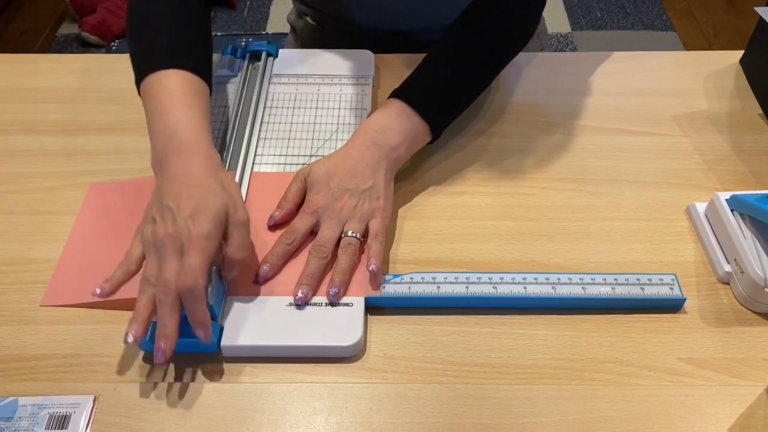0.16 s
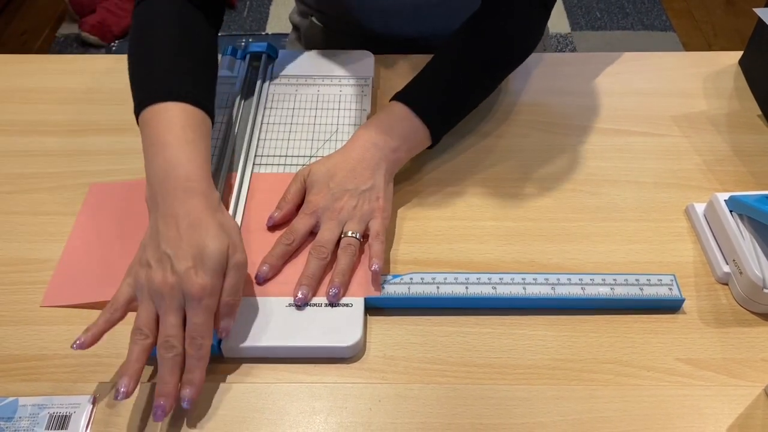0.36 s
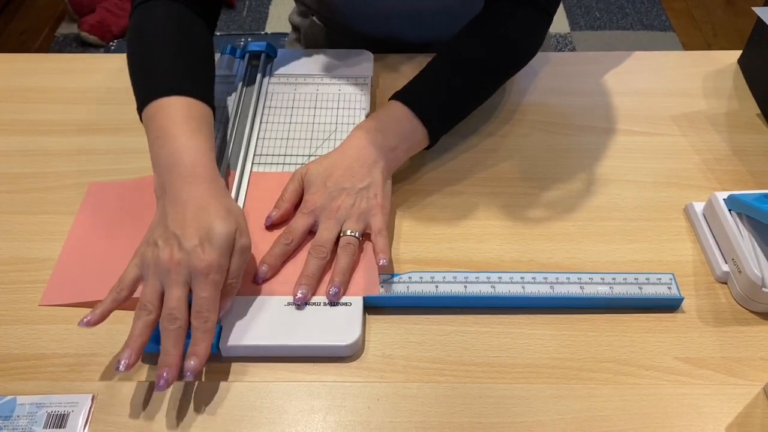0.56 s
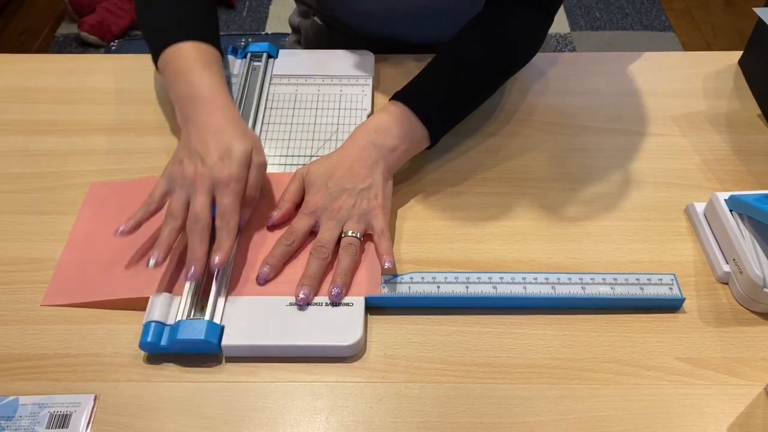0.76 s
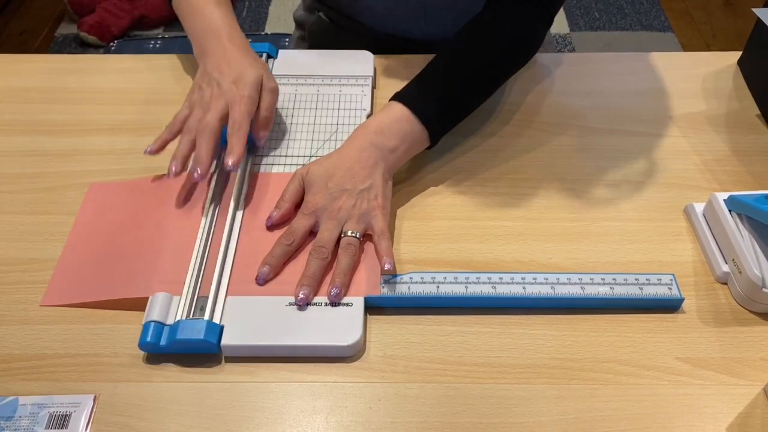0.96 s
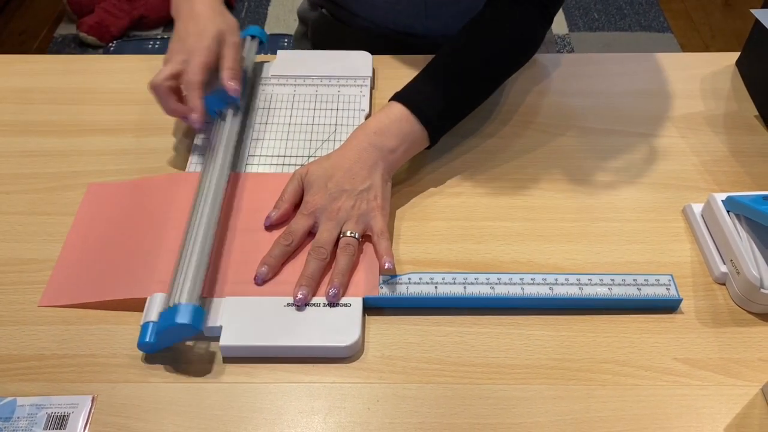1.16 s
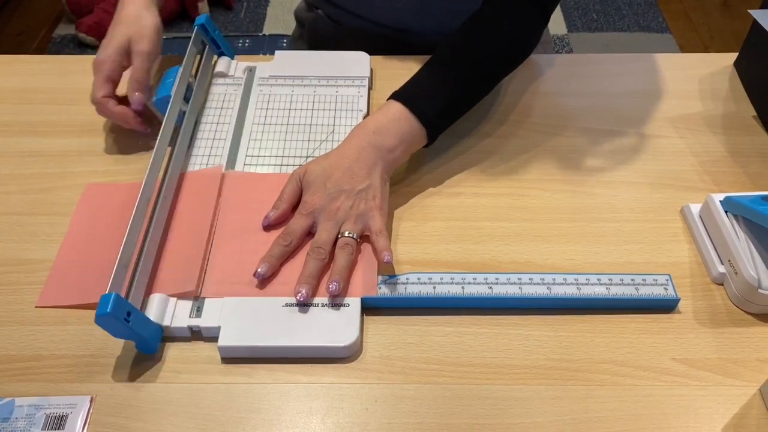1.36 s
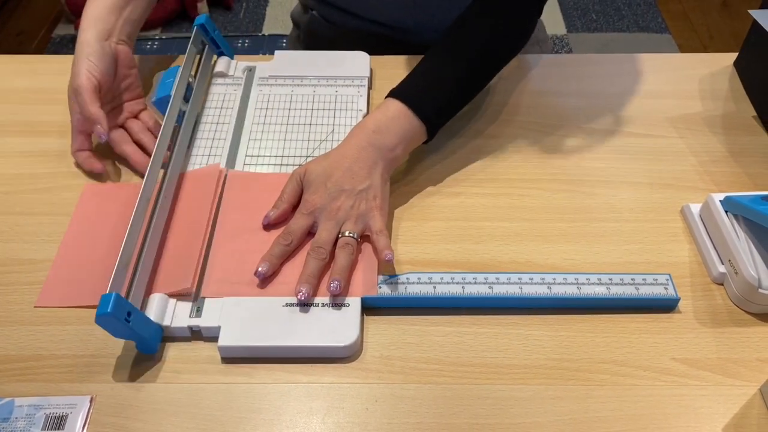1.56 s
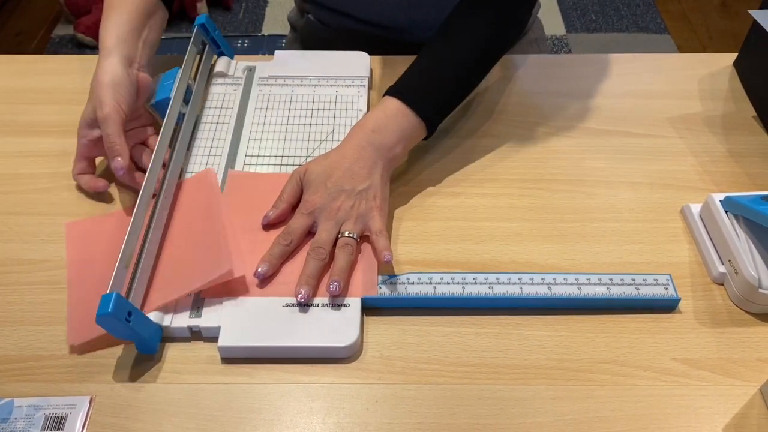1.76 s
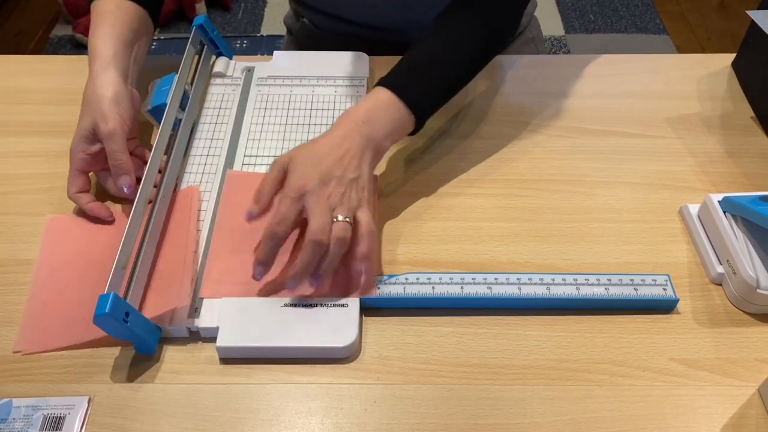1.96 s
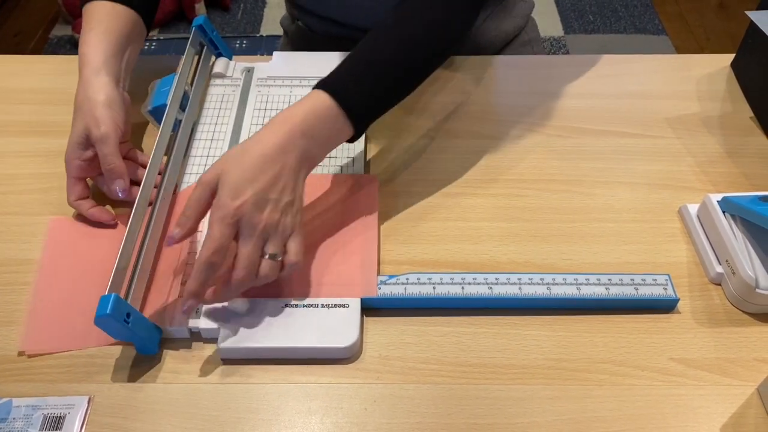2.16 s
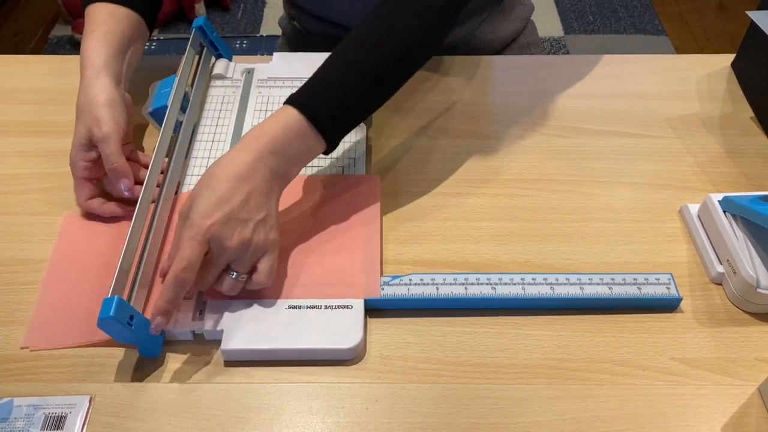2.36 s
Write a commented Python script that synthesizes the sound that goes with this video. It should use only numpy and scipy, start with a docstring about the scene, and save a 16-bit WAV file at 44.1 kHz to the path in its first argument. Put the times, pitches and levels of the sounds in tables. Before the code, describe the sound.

A paper trimmer is worked on a wooden desk, close up in a small quiet room. Faint handling leads to a loud, hollow plastic slap at 0.2 s, with small knocks until 0.4. The blade carriage slides with a gritty hiss from about 0.6 to 1.0 s. Clicks and a softer thud at 1.35-1.4 s open the rail; paper scrapes and rustles lightly until about 2.5 s.

```python
"""A plastic paper trimmer on a wooden desk in a small room. Paper is first handled, then the rail is slapped shut
and pressed home: damped modes of rail and base ring over low thuds in the desk and small clicks of the parts.
The blade carriage slides through a sheet as friction noise. The rail is pulled open against its stop, and the
cut halves are brushed across the base as swells of hiss, scrape and rumble. Quiet air noise lies under all."""
import sys
import numpy as np
from scipy import signal
from scipy.fft import rfft, irfft, next_fast_len
from scipy.io import wavfile
from scipy.ndimage import uniform_filter1d, map_coordinates

SR = 44100
rng = np.random.default_rng(int(sys.argv[2]) if len(sys.argv) > 2 else 0)


def dump_mix(stems):
    """Bounce the given channels to the path in sys.argv[1] as a 16-bit WAV at rate SR."""
    frames = np.atleast_2d(stems).T  # one column per channel
    limited = np.clip(frames, -1, 1)  # hard clip at full scale
    pcm = np.round(limited * 32767).astype(np.int16)
    wavfile.write(sys.argv[1], SR, pcm)


N = 110250

# colour of sliding paper, shared by its hiss and its crinkles: pitch_hz, relative_db
PAPER_HISS = [(600, -9), (1800, 2), (2400, 4), (3100, 1.5), (4000, 1.5), (6000, -0.5), (8500, -5.5),
              (10500, -4), (12000, -15), (14000, -4.5), (16000, -20)]
CLICK_RISE_S = 0.00038  # rise constant of clicks and crinkles


def amp(db):
    """Level to amplitude: a gain is ten to the power of dB over 20."""
    return 10 ** (np.asarray(db) / 20)


def unit(x):
    """Normalization: a signal divided by its root mean square has rms 1."""
    return x / np.sqrt(np.mean(x ** 2) + 1e-20)


def along(points, hz):
    """Log-frequency interpolation: (Hz, value) points joined by straight lines on a log axis."""
    point_hz, value = np.transpose(points)
    return np.interp(np.log(hz + 1), np.log(point_hz + 1), value)


def since(start_s):
    """Causality: time counts from the onset and stays zero before it."""
    return np.maximum(np.arange(N) / SR - start_s, 0)


def wobble(knots_per_s):
    """Band-limited randomness: a smooth curve through random knots."""
    knots = rng.standard_normal(N // 8)
    return map_coordinates(knots, [np.arange(N) * knots_per_s / SR], mode="wrap")


def filtered(x, response):
    """Linear filtering: the spectrum is multiplied by a function of frequency."""
    size = next_fast_len(N + SR // 2)  # padded against wrap-around
    return irfft(rfft(x, size) * response(np.fft.rfftfreq(size, 1 / SR)), size)[..., :N]


def spread(pair):
    """Interaural coherence: mid and side mixed so that left-right likeness follows frequency."""
    # likeness of left and right: pitch_hz, correlation
    likeness = [(100, 0.99), (250, 0.88), (600, 0.59), (1700, 0.14), (5000, 0.56), (11000, 0.033)]

    def mid_side_gains(hz):
        angle = np.arccos(np.clip(along(likeness, hz), -1, 1)) / 2
        return np.array([np.cos(angle), np.sin(angle)])

    mid, side = filtered(pair, mid_side_gains)
    return np.array([mid + side, mid - side])


def noise(spectrum, grain=1):
    """Source-filter principle: stereo noise, scaled by grain, then coloured and brought to rms 1."""
    source = spread(rng.standard_normal((2, N)) * grain)
    return unit(filtered(source, lambda hz: amp(along(spectrum, hz))))


def strike(start_s, rise_s, t60_s):
    """Impact envelope: quick rise, then exponential decay by 60 dB in t60."""
    t = since(start_s)
    decay = np.exp(-np.minimum(np.log(1000) * t / t60_s, 50))
    return (1 - np.exp(-t / rise_s)) * decay


def shell(x):
    """Resonance: narrow modes of the plastic shell and carriage colour a sound; rms 1."""
    # modes of shell and carriage, heard in clicks and sliding: pitch_hz, width_hz, boost_db
    modes = [(1740, 78, 5.5), (2200, 51, 5.5), (2567, 72, 6.5), (3180, 57, 3), (3536, 37, -4.5),
             (3920, 65, 6), (4380, 22, 5), (5380, 200, -1.5), (5930, 170, 3)]

    def response(hz):
        return amp(sum(boost_db / (1 + (2 * (hz - mode_hz) / width_hz) ** 2)
                       for mode_hz, width_hz, boost_db in modes))

    return unit(filtered(x, response))


def patchy(x):
    """Unsteady contact: random gain in patches of pitch and time makes the colour drift."""
    patch_db = 2.4  # rms depth
    cells = signal.stft(x, nperseg=256)[2]
    field = rng.standard_normal(cells.shape[1:])
    field = uniform_filter1d(uniform_filter1d(field, size=5, axis=0), size=9, axis=1)
    return unit(signal.istft(cells * amp(patch_db * unit(field)), nperseg=256)[1][:, :N])


def friction(spectrum, grain_db, rate, flutter_db):
    """Sliding friction: dense tiny slips of uneven size through a body's drifting colour."""
    # rate: grain knots per second
    slip_gain = amp(grain_db * wobble(rate) + flutter_db * wobble(45.12))
    return patchy(noise(spectrum, slip_gain))


def slams():
    """Impact excitation: the rail strikes plastic, a crack with a rattle, and rail and base ring."""
    # rail hitting its seat or its stop: start_s, level_db, contact_s
    hits = [(0.2064, -15, 0.00072), (1.386, -37, 0.002)]
    # modes of rail and base together: pitch_hz, relative_db, t60_s
    rail_modes = [(277, -10.5, 0.099), (316, -15, 0.146), (459.4, -1.5, 0.072), (627, -10, 0.14),
                  (696, -13.5, 0.084), (762, -4, .05), (890, -5, 0.03), (1457, -2.5, 0.03),
                  (1850, -6, 0.035), (2096, -15.5, 0.062), (2342, -2, 0.03), (2993, -33, 0.16),
                  (3530, -7, 0.025), (3900, -19, 0.043)]
    # colour of the crack: pitch_hz, relative_db
    crack_colour = [(150, 2), (300, 0.5), (440, 8.5), (800, 0.5), (1100, -11.5), (2400, -11.5), (3000, -13),
                    (6000, -20), (9000, -26.5), (15000, -52)]
    crack_db, crack_t60_s = 1, 0.039
    rattle_db, rattle_t60_s = -15.5, 0.21  # loose parts buzz on after the blow
    phase_blur_rad = 1  # phase wander of the loose rail's ring

    force, ring = np.zeros((2, N))
    for start_s, level_db, contact_s in hits:
        crack = strike(start_s, contact_s, crack_t60_s)
        rattle = amp(rattle_db) * strike(start_s, contact_s, rattle_t60_s)
        force += amp(level_db) * (crack + rattle)
        for hz, mode_db, t60_s in rail_modes:
            phase = 2 * np.pi * (hz * since(start_s) + rng.random()) + phase_blur_rad * wobble(70)
            ring += amp(level_db + mode_db) * strike(start_s, contact_s, t60_s) * np.sin(phase)
    return amp(crack_db) * force * noise(crack_colour), ring


def thuds():
    """Damped oscillation: the base bumps the desk for a few low cycles, then the desk top sways."""
    # blunt pushes into the desk: start_s, level_db, pitch_hz, t60_s
    pushes = [(0.049, -28, 187, 0.076), (0.211, -3.5, 191, 0.022), (0.368, -24.5, 288, 0.054),
              (0.3997, -16.5, 128, 0.025), (1.109, -29.5, 228, 0.054), (1.126, -30.5, 150, 0.083),
              (1.339, -28, 224, 0.049), (1.355, -20.5, 222, 0.054), (1.373, -27.5, 100, 0.062),
              (1.375, -9.5, 197, 0.034), (1.383, -25.5, 333, 0.063), (1.401, -26, 214, 0.035),
              (1.444, -35, 196, 0.051), (1.494, -34.5, 563, 0.067), (2.017, -33.5, 646, 0.06)]
    # colour of the noise within each thud: pitch_hz, relative_db
    body_colour = [(25, 13), (60, -11), (130, -6), (350, 1.5), (600, -15), (2000, -60)]
    rise_s, body_db = 0.00077, -9.5
    desk_hz, desk_db, desk_t60_s = 60.2, -23.5, 0.23  # desk level relative to each thud

    body = amp(body_db) * noise(body_colour)
    out = np.zeros((2, N))
    for start_s, level_db, hz, t60_s in pushes:
        turns = 2 * np.pi * since(start_s)
        bump = strike(start_s, rise_s, t60_s) * (np.sin(hz * turns) + body)
        sway = amp(desk_db) * strike(start_s, rise_s, desk_t60_s) * np.sin(desk_hz * turns)
        out += amp(level_db) * (bump + sway)
    return out


def clicks():
    """Brief hard contact: a sharp edge, a hollow clack and the damped ring of the struck part."""
    # plastic parts, nails and paper edges snapping:
    # start_s, clack_db, edge_db, ring_hz, ring_db, edge_t60_s
    snaps = [(0.022, -42, -53, 1790, -45, 0.018), (0.186, -51, -48.5, 5760, -52, 0.032),
             (0.2007, -31, -38, 1040, -37, 0.02), (0.207, -21, -23, 2320, -46, 0.0094),
             (0.3225, -38, -47, 1137, -35.5, 0.032), (0.3604, -28.5, -41.5, 894, -29, 0.016),
             (0.39, -38.5, -51, 2196, -40.5, 0.025), (0.483, -47, -75, 2110, -47, 0.063),
             (0.503, -44.5, -79, 1330, -44, 0.04), (0.605, -47, -62, 1057, -45.5, 0.037),
             (0.8909, -48, -26, 5400, -30.5, .014), (0.894, -48, -33, 2340, -30, 0.011),
             (1.043, -52, -45.5, 1760, -44.5, 0.035), (1.099, -40, -41, 2267, -42, 0.033),
             (1.103, -38.5, -51, 2275, -42, 0.039), (1.1035, -63, -37, 13800, -37, 0.007),
             (1.125, -39, -68, 855, -45, 0.022), (1.169, -62, -27.5, 5720, -30, 0.009),
             (1.1706, -41.5, -45, 2270, -34, 0.028), (1.1948, -45, -39.5, 5670, -40, 0.031),
             (1.289, -37.5, -43.5, 4540, -42.5, 0.014), (1.3447, -40, -64, 5160, -47, 0.055),
             (1.3607, -44, -30.5, 5660, -52, 0.036), (1.3646, -32, -27.5, 3650, -33, 0.042),
             (1.3811, -35, -27.5, 10180, -32, 0.028), (1.386, -52, -30, 1650, -29.5, 0.026),
             (1.431, -55, -43, 1690, -40, 0.047), (1.461, -41, -43, 1910, -50, 0.014),
             (1.486, -40.5, -39, 13300, -51, 0.016), (1.577, -41, -31, 3920, -31.5, 0.013),
             (1.5803, -53, -36.5, 2780, -34.5, 0.017), (1.6581, -41, -44.5, 1280, -39.5, 0.022),
             (1.7431, -40, -41, 2860, -40.5, 0.033), (1.748, -37.5, -43.5, 1770, -39, 0.02),
             (1.787, -54.5, -68, 1602, -46.5, 0.092), (2.0157, -35, -51, 4620, -38, 0.011),
             (2.029, -48, -50.5, 2260, -51, 0.031), (2.382, -45, -47, 4230, -56, 0.017),
             (2.3912, -51, -39, 11000, -45, 0.013), (2.411, -69, -45, 3900, -52, 0.015)]
    # colour of the hollow clack: pitch_hz, relative_db
    clack_colour = [(150, -61), (450, 7), (900, 2), (1300, 1), (1800, 0.5), (2050, -5), (2350, 0),
                    (3000, -7), (6000, -15), (15000, -63)]
    # colour of the sharp edge: pitch_hz, relative_db
    edge_colour = [(800, -42), (2500, 0.5), (4200, -1), (5700, 2), (8000, -7), (10000, -1.5),
                   (12000, -14.5), (14000, -6.5), (16000, -14.5)]
    clack_stretch, ring_stretch = 1.77, 1.83  # decay times relative to the edge
    blur_rad, blur_knots_per_s = 0.89, 454.7  # phase wander of a ring at blur_pitch_hz
    blur_pitch_hz = 2600  # higher rings smear more

    clack, edge, ring = np.zeros((3, N))
    blur = blur_rad * wobble(blur_knots_per_s) / blur_pitch_hz
    for start_s, clack_db, edge_db, hz, ring_db, t60_s in snaps:
        clack += amp(clack_db) * strike(start_s, CLICK_RISE_S, t60_s * clack_stretch)
        edge += amp(edge_db) * strike(start_s, CLICK_RISE_S, t60_s)
        tone = np.sin(hz * (2 * np.pi * since(start_s) + blur))
        ring += amp(ring_db) * strike(start_s, CLICK_RISE_S, t60_s * ring_stretch) * tone
    return clack * shell(noise(clack_colour)) + edge * shell(noise(edge_colour)), ring


def carriage():
    """Friction and fracture: the blade parts fibres with a hiss as the carriage chatters and rumbles."""
    # course of the stroke: time_s, friction_db
    stroke = [(0.461, -101), (0.49, -88), (0.58, -69.5), (0.605, -63.5), (0.661, -58.5), (0.715, -50),
              (0.79, -49), (0.88, -48.5), (0.93, -54), (1.03, -64), (1.09, -68.5), (1.2, -81), (1.3, -107)]
    # colour of the cut fibres: pitch_hz, relative_db
    cut_colour = [(300, -9), (800, 0), (1400, 1.5), (1750, -3.5), (2020, -6), (2550, -0.5), (3150, -6),
                  (4700, -7.5), (5600, -2), (7000, -3.5), (8300, -16), (10000, -3.5), (12000, -28),
                  (14000, -3), (16000, -37)]
    # colour of the carriage chattering on its rail: pitch_hz, relative_db
    chatter_colour = [(300, -32), (900, -11), (1300, 8), (1750, 0), (2020, -4), (2550, -3), (3300, 0),
                      (5500, -5.5), (12000, -25)]
    # colour of the rumble along the rail: pitch_hz, relative_db
    rumble_colour = [(25, -26), (60, -9), (115, 2.5), (165, -3), (230, 0), (330, 1), (400, -8.5),
                     (460, -0.5), (560, -12.5), (900, -17), (2000, -27.5)]
    cut_db, chatter_db = 5.5, -2.5  # relative to the stroke
    rumble_peak_db, rumble_growth = -38, 0.59  # growth: rumble dB per stroke dB

    time_s, friction_db = np.transpose(stroke)
    level = np.interp(since(0), time_s, friction_db, left=-120, right=-120)
    rumble_level = rumble_peak_db + rumble_growth * (level - friction_db.max())
    cut = shell(friction(cut_colour, grain_db=0, rate=1700, flutter_db=0.2))
    chatter = shell(friction(chatter_colour, grain_db=4.5, rate=300, flutter_db=2.5))
    rumble = friction(rumble_colour, grain_db=1, rate=200, flutter_db=1.5)
    return amp(level + cut_db) * cut + amp(level + chatter_db) * chatter + amp(rumble_level) * rumble


def brushes():
    """Sliding contact: each move of paper or hand swells and fades as hiss, scrape and desk rumble."""
    # paper sliding and hands handling it: peak_s, rise_s, fall_s, hiss_db, scrape_db, rumble_db
    moves = [(0.02, 0.16, 0.052, -58.5, -53.5, -47), (0.15, 0.16, 0.14, -76, -63, -46),
             (0.42, 0.091, 0.11, -96, -51, -43.5), (1.20, 0.12, 0.21, -67, -57.5, -46.5),
             (1.34, 0.031, 0.051, -66, -51, -39), (1.43, 0.087, .11, -59, -51, -43.5),
             (1.54, 0.031, 0.055, -57.5, -53, -49), (1.605, 0.071, 0.11, -54, -48, -48),
             (1.69, 0.084, 0.066, -58.5, -62, -61), (1.80, 0.08, 0.28, -62.5, -64, -48.5),
             (1.97, 0.067, 0.027, -81, -57.5, -77), (2.021, 0.028, 0.024, -56.5, -68, -50.5),
             (2.295, 0.031, 0.031, -46, -55.5, -62), (2.424, 0.049, 0.053, -52.5, -59, -57),
             (2.497, 0.017, .05, -48, -47, -62)]
    # colour of the duller scrape: pitch_hz, relative_db
    scrape_colour = [(200, -10), (550, 9), (900, 7), (1700, -0.5), (2600, -11), (5000, -26.5), (15000, -60)]
    # colour of the rumble in the desk: pitch_hz, relative_db
    rumble_colour = [(25, -55), (60, -3.5), (130, -4), (220, 1), (330, -8.5), (500, -8), (900, -37.5),
                     (3000, -118)]

    t = since(0)
    power = np.zeros((3, N))  # overlapping moves add in power
    for peak_s, rise_s, fall_s, *levels_db in moves:
        distance = np.where(t < peak_s, (peak_s - t) / rise_s, (t - peak_s) / fall_s)
        power += amp(levels_db)[:, None] ** 2 * np.exp(-2 * distance ** 2)
    hiss, scrape, rumble = np.sqrt(power)
    hiss_noise = friction(PAPER_HISS, grain_db=-1.0, rate=1800, flutter_db=1.5) + crinkles()
    scrape_noise = friction(scrape_colour, grain_db=1.0, rate=360, flutter_db=3.5)
    return hiss * hiss_noise + scrape * scrape_noise + rumble * noise(rumble_colour)


def crinkles():
    """Random impulses: tiny snaps of uneven size in the moving sheet."""
    snaps_per_s, size_spread_db, level_db = 520, 3.5, -6
    sizes = amp(size_spread_db * np.clip(rng.standard_normal(N), -2, 2))
    snaps = (rng.random(N) < snaps_per_s / SR) * sizes
    grain = signal.fftconvolve(snaps, strike(0, CLICK_RISE_S, t60_s=0.0022))[:N]
    return amp(level_db) * noise(PAPER_HISS, grain)


def room(x):
    """Reverberation: the walls answer with a diffuse noise tail that decays at a rate set by pitch."""
    # decay of the room: pitch_hz, t60_s
    decay = [(50, 0.71), (200, 0.35), (1000, 0.3), (5000, 0.3), (14000, 0.27)]
    # level of the tail: pitch_hz, wet_db
    wet = [(50, -4), (150, -20), (300, -4), (600, -4.5), (1600, -2.5), (5000, -7.5), (14000, -8.5)]
    delay_s, tail_samples = 0.007, SR // 2

    diffuse = spread(rng.standard_normal((2, N)))[:, :tail_samples]
    hz, t, cells = signal.stft(diffuse, SR, nperseg=256)
    t60_s = along(decay, hz)[:, None]
    # the square root evens out the energy of long and short tails
    fade = np.exp(-np.log(1000) * t / t60_s) * np.sqrt(2 * np.log(1000) / (t60_s * SR))
    tail = signal.istft(cells * fade * amp(along(wet, hz))[:, None], SR, nperseg=256)[1]
    delayed = np.pad(tail, ((0, 0), (int(delay_s * SR), 0)))
    return signal.fftconvolve(x.mean(0)[None], delayed, axes=1)[:, :N]


def air():
    """Stationary noise: the steady, mostly low background of the room."""
    # colour of the background: pitch_hz, relative_db
    air_colour = [(25, -2), (65, -0.5), (105, -7.5), (150, -4.5), (200, 0.5), (260, -5.5), (400, -8),
                  (700, -15.5), (1500, -19.5), (3000, -30), (8000, -41.5), (15000, -59)]
    return amp(-50.5) * noise(air_colour)


def scene():
    """Superposition: blows with their room tail, friction and quiet air add up."""
    crack, rail_ring = slams()
    snaps, part_ring = clicks()
    blows = crack + snaps + thuds()
    ring = rail_ring + part_ring
    echo = room(blows + 0.35 * ring)  # the rings reach the walls only weakly
    return blows + ring + echo + carriage() + brushes() + air()


def record(dry):
    """Spaced reception: two close microphone ports differ in phase and level; deep bass and top are cut."""
    # level difference of the ports: pitch_hz, left_over_right_db
    lean = [(130, -1.2), (300, -0.4), (1400, 1.6), (4000, 0), (10000, -0.5)]
    # phase difference of the ports: pitch_hz, left_leads_rad
    lead = [(100, -0.069), (600, 0.32), (2000, 0.92), (3300, 2.1), (5000, -0.31), (11000, -1.6)]
    top_hz, low_cut_hz = 15700, 44  # low_cut_hz: corner of each of two bass-cut stages
    sides = np.array([[0.5], [-0.5]])  # each port takes half the difference

    def response(hz):
        ports = amp(sides * along(lean, hz)) * np.exp(1j * sides * along(lead, hz))
        bass_cut = (1j * hz / (1j * hz + low_cut_hz)) ** 2
        return ports * (hz < top_hz) * bass_cut

    return filtered(dry, response)


dry = scene()
out = record(dry)
dump_mix(out)
```